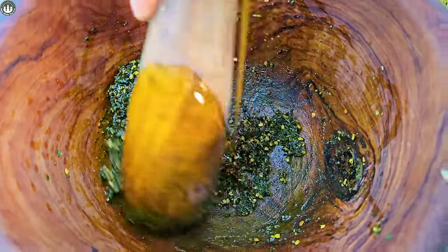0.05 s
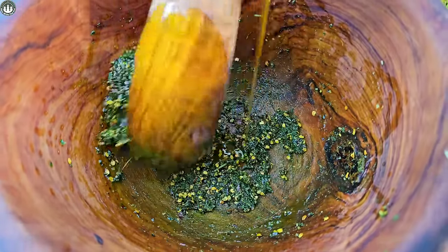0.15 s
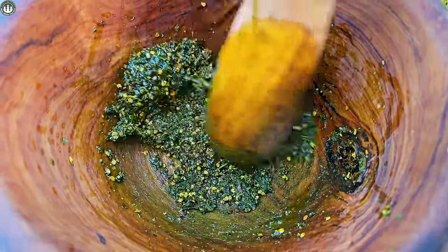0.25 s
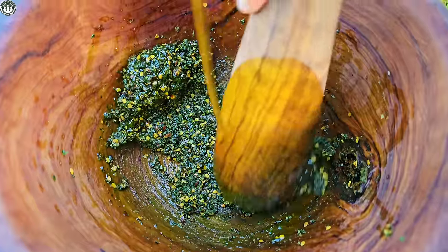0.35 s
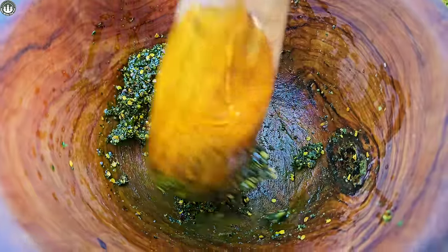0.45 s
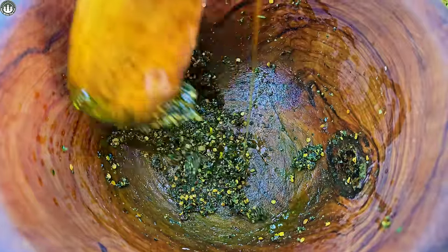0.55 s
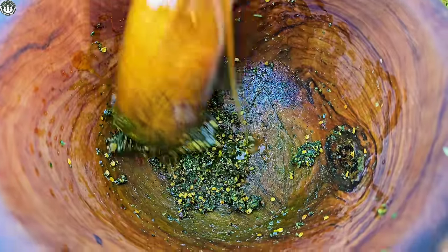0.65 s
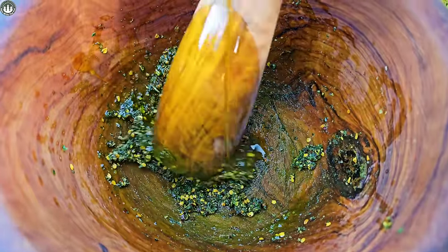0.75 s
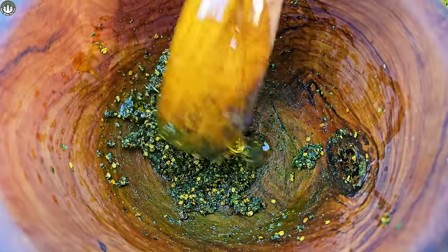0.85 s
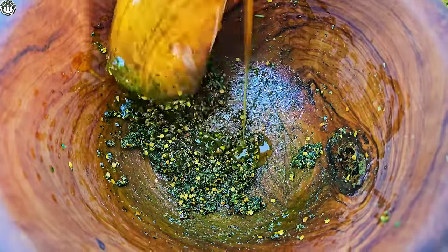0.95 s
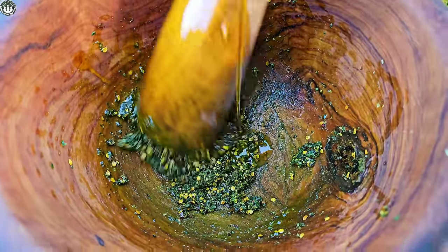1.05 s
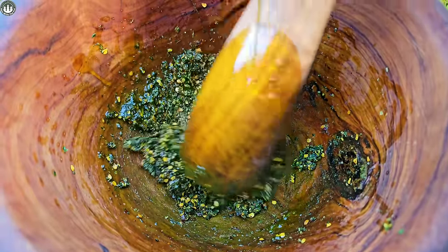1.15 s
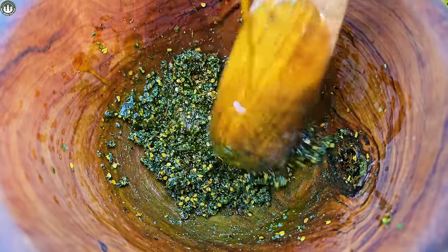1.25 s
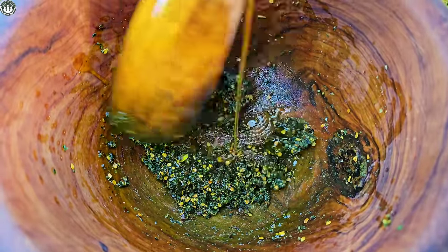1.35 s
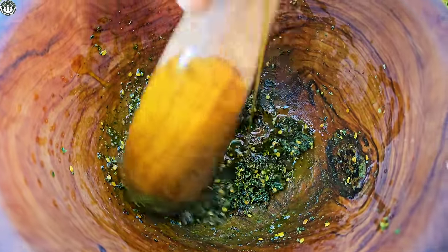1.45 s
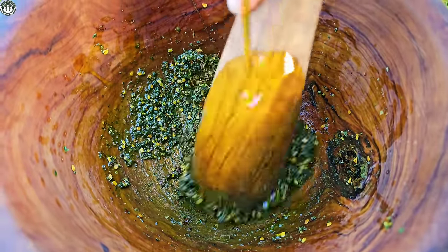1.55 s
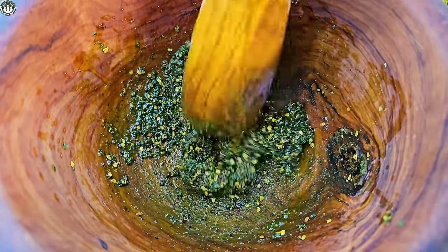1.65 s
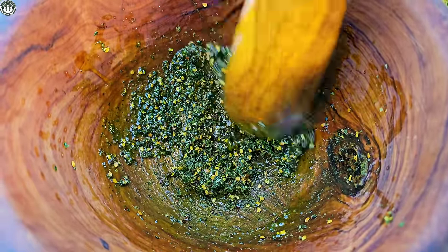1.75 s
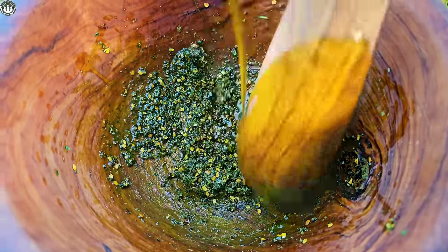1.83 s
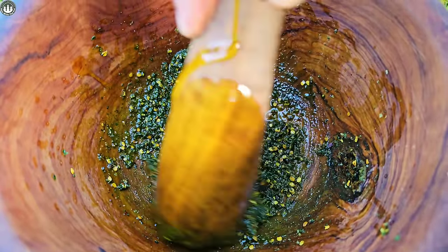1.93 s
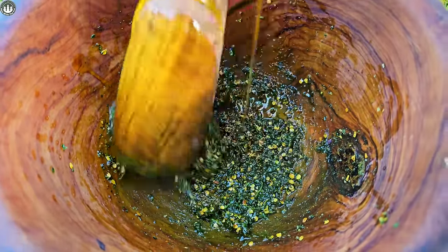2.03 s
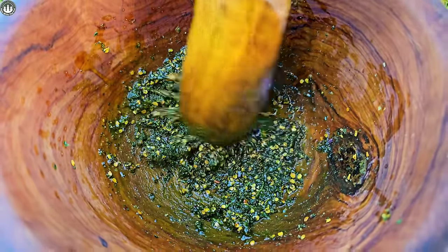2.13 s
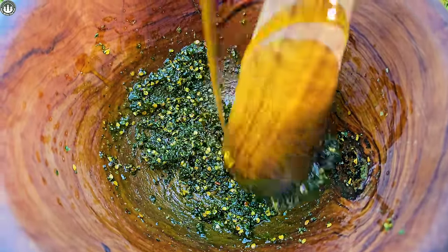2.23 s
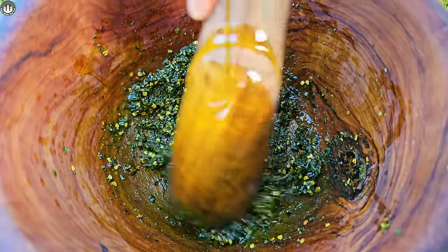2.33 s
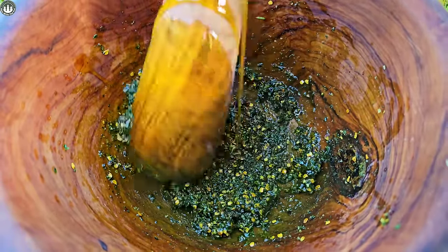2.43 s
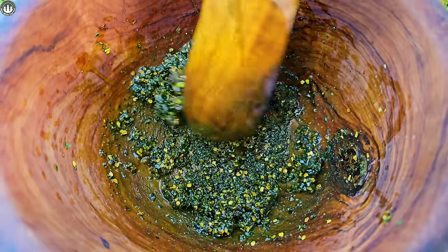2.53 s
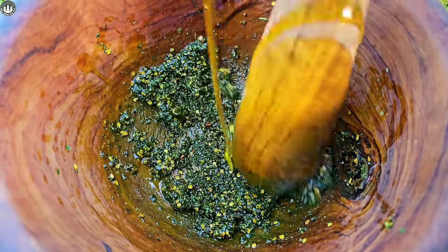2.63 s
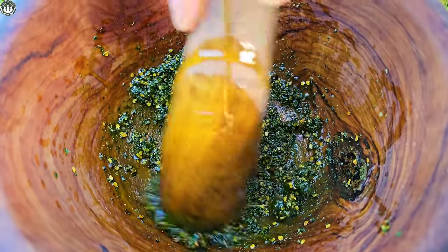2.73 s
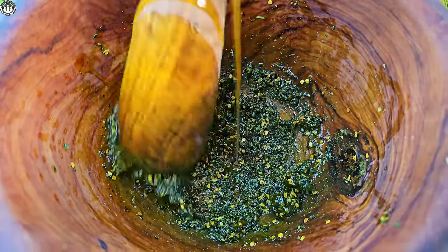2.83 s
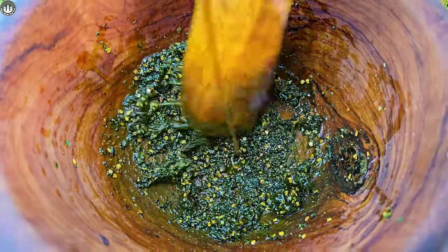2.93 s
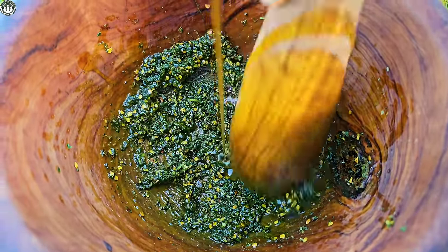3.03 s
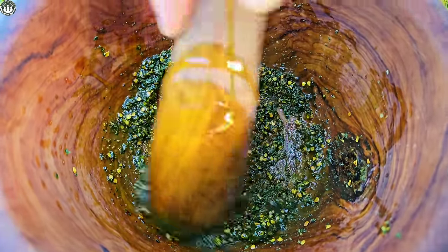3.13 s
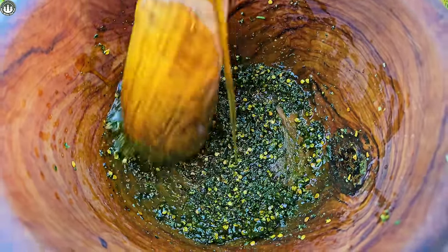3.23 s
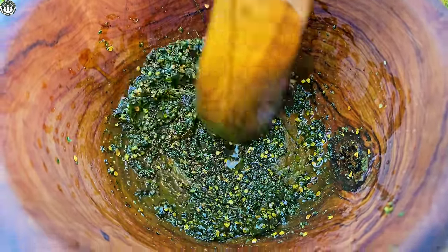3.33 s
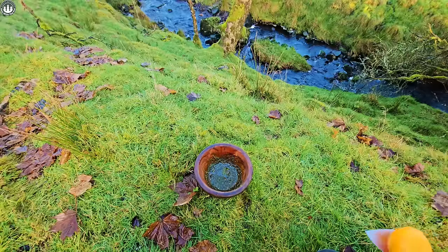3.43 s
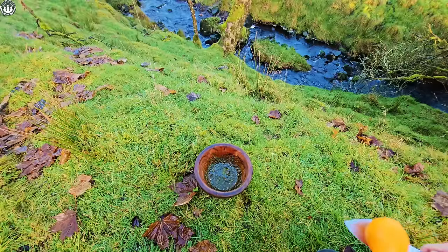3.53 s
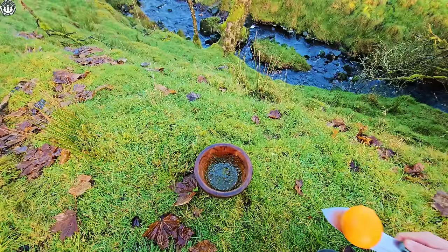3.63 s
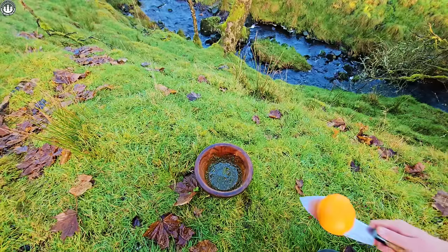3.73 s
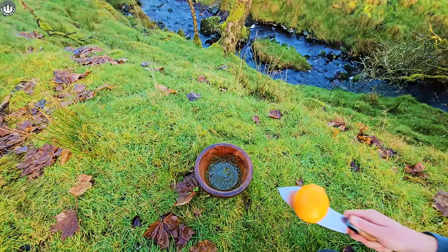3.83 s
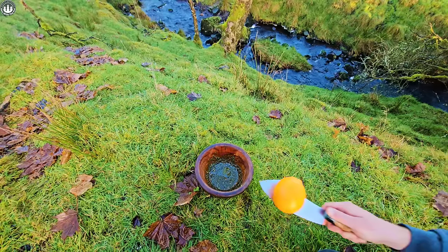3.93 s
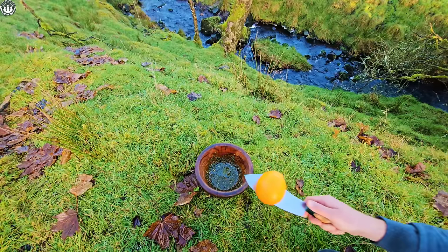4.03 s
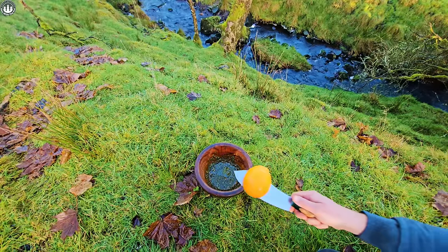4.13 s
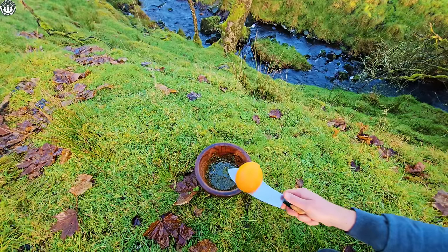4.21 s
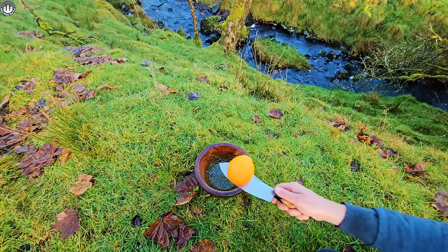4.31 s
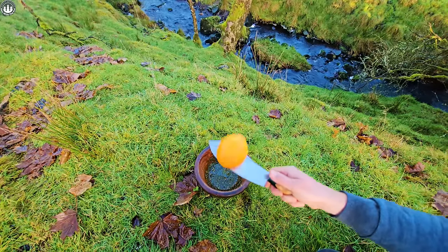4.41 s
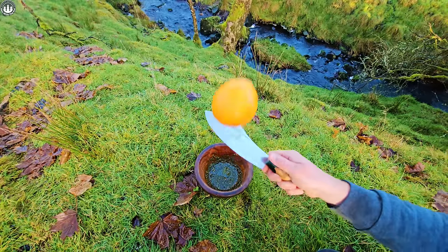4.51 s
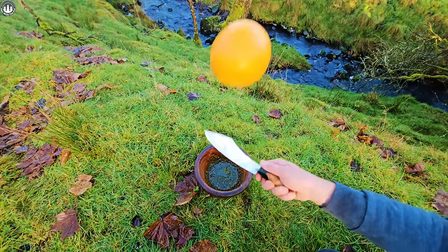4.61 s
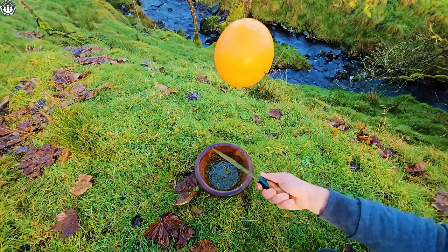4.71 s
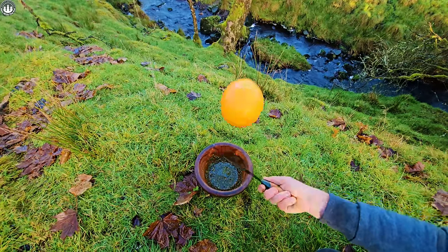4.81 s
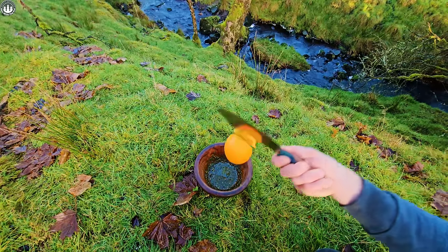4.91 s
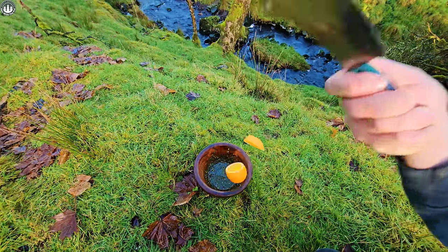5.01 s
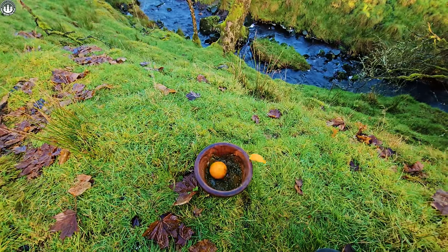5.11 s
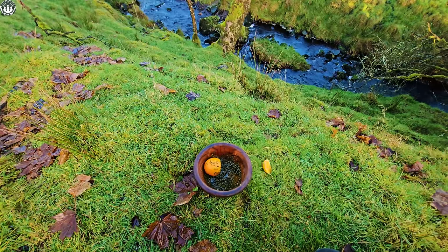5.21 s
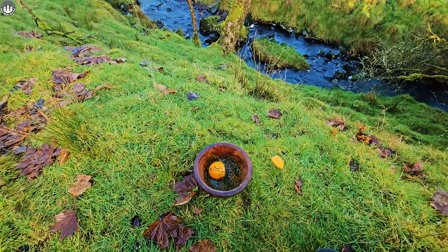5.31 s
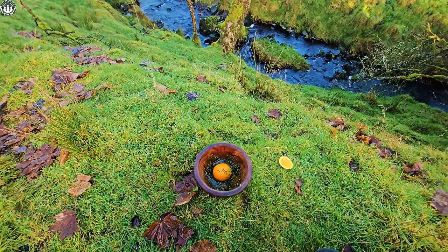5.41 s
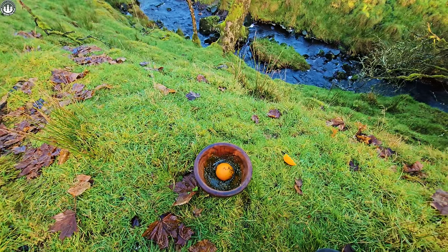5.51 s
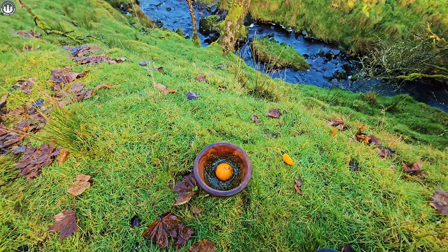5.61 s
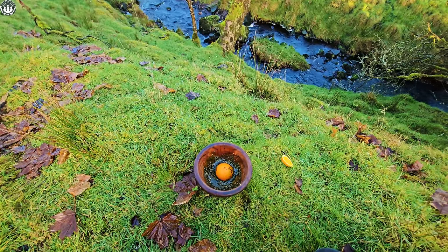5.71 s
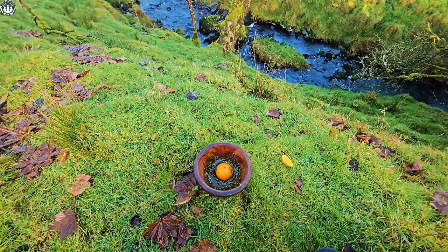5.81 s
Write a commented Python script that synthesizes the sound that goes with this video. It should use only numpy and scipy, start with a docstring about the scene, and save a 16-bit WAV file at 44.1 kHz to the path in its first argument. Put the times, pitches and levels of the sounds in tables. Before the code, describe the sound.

Close to the microphone, outdoors, a wooden pestle drags through oily herbs and seeds in a wooden mortar. Leaves crunch, seeds snap and oil fizzes, with a few hollow, thudding blows before the grinding turns continuous. It stops suddenly and a small stream babbles softly. Further off, a knife chops a citrus fruit with a wet slap, and the fruit drops into the mortar. A low breeze runs throughout.

```python
"""Close by, outdoors, a wooden pestle drags through oily herbs and seeds in a wooden mortar and pounds
them: leaves crunch and pop, seeds snap, oil fizzes, and the blows ring the bowl and thud on the ground.
From 1.5 s the pestle circles without lifting. At 3.6 s it stops and the scene moves beside a small stream.
At 5 s, further off, a knife chops through a tossed citrus fruit with a wet slap; the fruit drops into
the mortar and the cut-off end skips into the grass. A low breeze runs throughout."""
import sys
import numpy as np
from scipy import signal
from scipy.fft import rfft, irfft, next_fast_len
from scipy.io import wavfile
from scipy.ndimage import uniform_filter1d, map_coordinates

SR = 44100
rng = np.random.default_rng(int(sys.argv[2]) if len(sys.argv) > 2 else 0)


def store_wav(level_fs):
    """Save 16-bit WAV to argv[1]."""
    pcm = np.round(np.clip(np.atleast_2d(level_fs), -1, 1) * 32767)
    wavfile.write(sys.argv[1], SR, pcm.T.astype(np.int16))


N = 258418
TIME_S = np.arange(N) / SR


# freq_hz, level_db
CRUNCH_SPECTRUM = [(300, -65), (750, -32), (1000, -6), (1500, -7), (2000, 2), (2600, -1.5), (3300, 2.5),
                   (4500, -3), (6500, -28), (10000, -37.5), (16000, -40.5)]
FIZZ_SPECTRUM = [(2000, -10), (4500, 9), (8000, 4), (9600, -0.5), (10600, -7.5), (12500, 1), (15500, -1)]
RUMBLE_SPECTRUM = [(15, -27), (35, -5), (80, 3.5), (160, 1), (240, 0), (340, -8), (500, -7), (1000, -56)]

def grinding():
    """Leaves and seeds crush in tiny fractures; the dragging pestle sounds and shakes the mortar."""
    on_paste, on_wood = pestle_force()
    slip_db = 2.04 * wobble(70)  # catch and slide
    oil_db = -1.0 * TIME_S  # oil softens fizz and rub
    grit = grains(rate_hz=2000, spread_db=-1.5, life_s=0.0021)
    crunch = amp(-40.5 + slip_db) * on_paste * grit * wet_cavities(noise(shape(CRUNCH_SPECTRUM)))
    oil_films = grains(rate_hz=350, spread_db=7, life_s=0.00015)
    fine_grit = grit * wet_cavities(noise(shape(FIZZ_SPECTRUM)))
    film_pops = amp(-7.5) * oil_films * noise(shape(FIZZ_SPECTRUM))
    wetness = ((on_paste + 1e-9) / (on_wood + 1e-9)) ** 0.36
    fizz = amp(-42.5 + slip_db + oil_db) * on_paste ** 0.67 * wetness * (fine_grit + film_pops)
    friction = wandering_hollow(grit * noise(np.ones_like))
    rub = amp(-39.5 + slip_db + oil_db) * on_wood ** 1.07 * friction
    rumble = amp(-43.5 + 0.94 * wobble(50)) * on_wood ** 0.98 * noise(shape(RUMBLE_SPECTRUM))
    return pan(crunch + fizz, left_db=7.5) + pan(rub, left_db=3.5) + pan(rumble, left_db=5)


# peak_s, rise_s, fall_s, force_db, wood_contact_db
PESTLE_DRAGS = [(0.019, 0.12, 0.041, 1, 5.5), (0.102, 0.041, 0.027, 5, -1),
                (0.174, 0.045, 0.071, 3.5, -5.5), (0.347, 0.086, 0.061, 3.5, 0.5),
                (0.446, 0.018, 0.024, -2, -5), (0.794, 0.052, 0.027, 2.5, -1.5),
                (.885, 0.029, 0.031, -4.5, -5.5), (1.165, 0.047, 0.055, 2, -0.5),
                (1.279, 0.048, 0.029, -1, 7.5)]
# time_s, force_db, wood_contact_db
PESTLE_CIRCLING = [(1.505, -1, -5.5), (1.73, -4.5, -1), (1.79, -9, 1), (1.88, -2, -0.5),
                   (1.989, -2.5, -2.5), (2.07, 0, -6), (2.13, -2.5, -1.5), (2.27, 2, 1.5), (2.39, -8, -1.5),
                   (2.58, -4, -6), (2.7, 1, 2.5), (2.78, -8, 1), (2.87, 0.5, 3.5), (2.97, -3, 2.5),
                   (3.04, 2.5, 4), (3.19, -3, 0.5), (3.3, 0, 1), (3.555, 2, 3)]

def pestle_force():
    """Force on the paste and on bare wood, as gains: single drags, then unbroken circling."""
    pushes = [amp(db) * swell(s, s, rise_s, fall_s) for s, rise_s, fall_s, db, _ in PESTLE_DRAGS]
    contacts = [amp(db) for *_, db in PESTLE_DRAGS]
    knots_s, force_db, contact_db = np.transpose(PESTLE_CIRCLING)
    circling = swell(knots_s[0], knots_s[-1], rise_s=0.02, fall_s=0.027)
    pushes.append(amp(np.interp(TIME_S, knots_s, force_db)) * circling)
    contacts.append(amp(np.interp(TIME_S, knots_s, contact_db)))
    wood_pushes = [push * contact for push, contact in zip(pushes, contacts)]
    return np.max(pushes, axis=0), np.max(wood_pushes, axis=0)


def wet_cavities(x, depth_db=3):
    """Shifting wet cavities lift and drop narrow bands from moment to moment."""
    spectra = signal.stft(x, nperseg=512)[2]
    field = uniform_filter1d(rng.standard_normal(spectra.shape[1:]), size=4, axis=0)
    field = unit(uniform_filter1d(field, size=5, axis=1))
    return unit(signal.istft(spectra * amp(depth_db * field), nperseg=512)[1][:, :N])


# pitch_hz, width_hz, level_db
HOLLOW_RESONANCES = [(536, 54, 1.5), (1172, 87, -14.5), (2200, 54, -7), (3110, 93, -15)]

def hollow(f):
    """Response of the mortar's hollow with the pestle in it."""
    return sum(amp(db) * resonance(f, hz, width_hz) for hz, width_hz, db in HOLLOW_RESONANCES)


def wandering_hollow(x, shift=0.042):
    """The hollow sounds lower or higher as the pestle moves about in it."""
    low, high = [unit(filtered(x, lambda f: hollow(f / ratio))) for ratio in (1 - shift, 1 + shift)]
    blend = np.clip(0.5 + 0.5 * wobble(9), 0, 1)
    return unit((1 - blend) * low + blend * high)


# start_s, crack_db, crack_hz, wall_db, ring_db, ring_hz, thud_db, rock_db
PESTLE_BLOWS = [(0.6759, -6, 4200, -10.5, -11, 480, 2.5, -30), (1.0414, -8, 850, -7.5, -0.5, 487, 4, -30),
                (1.4733, -17, 3350, -19.5, -15.5, 477, 3, -15.5),
                (2.1007, -19, 6300, -20, -25.5, 507, 1.5, -15.5)]
# freq_hz, level_db
CRACK_SPECTRUM = [(200, 4), (700, 8), (1400, 12), (2500, 3.5), (4500, 0), (8000, -3), (16000, 5)]
# freq_hz, left_db
CRACK_PAN = [(700, -6), (4500, 7), (7500, 5)]
# pitch_hz, level_db, t60_s
WALL_MODES = [(1730, -8, .017), (2030, 3.5, 0.02), (2405, -3, 0.021), (3095, 8.5, 0.012), (4770, 0, 0.01)]
# pitch_ratio, level_db, t60_s
CAVITY_MODES = [(.84, -21, 0.05), (1.001, -1.5, 0.094), (1.17, -23, 0.06), (2.61, -21, 0.039)]

def blows():
    """The pestle smacks through the paste; wall and hollow ring; the mortar thuds and rocks."""
    out, t = np.zeros((2, N)), np.arange(SR // 5) / SR
    mode = lambda hz, t60_s: damped_sine(t, hz, t60_s, attack_s=0.0028)
    low_cut = lambda f: 1j * f / (57.3 + 1j * f)  # keeps deep rumble out of the thud
    thud = filtered(mode(hz=187, t60_s=0.01), low_cut)
    rock = filtered(mode(hz=90, t60_s=0.042), low_cut)
    choke = np.exp(-(t / 0.07) ** 2)  # paste closes round the pestle
    paste_yield_s = 0.00195
    for s, crack_db, crack_hz, wall_db, ring_db, ring_hz, thud_db, rock_db in PESTLE_BLOWS:
        contact = lambda f: resonance(f, crack_hz, 1.05 * crack_hz)  # more paste, duller crack
        crack_colour = lambda f: contact(f) * shape(CRACK_SPECTRUM)(f)
        crack = burst(fade(t, t60_s=0.011, attack_s=0.00068), crack_colour)
        wall = sum(amp(db) * abs(contact(hz)) * mode(hz, t60_s) for hz, db, t60_s in WALL_MODES)
        ring = sum(amp(db) * mode(ratio * ring_hz, t60_s) for ratio, db, t60_s in CAVITY_MODES)
        add(out, s, amp(crack_db + 1.5) * pan_bands(crack, CRACK_PAN))
        add(out, s, amp(wall_db) * pan(wall, left_db=2))
        add(out, s, -pan(amp(thud_db) * thud + amp(rock_db) * rock, left_db=-2.5))
        add(out, s + paste_yield_s, amp(ring_db) * pan(choke * ring, left_db=1.8))
    return out


# start_s, snap_db, t60_s, pitch_hz, width_oct, jolt_db
SEED_BURSTS = [(.004, -24, 0.039, 7100, 1.9, -28), (.304, -14.5, 0.032, 2970, 0.57, -30),
               (0.3162, -9, 0.009, 3800, 0.67, -23), (.339, -17.5, 0.018, 6000, .9, -24),
               (.362, -23, 0.043, 4470, 0.79, -20.5), (1.281, -19.5, .012, 3500, 1.2, -22.5),
               (1.4755, -11, 0.016, 3020, 0.37, -36), (2.038, -23, 0.066, 3300, 0.7, -28.5),
               (2.218, -17, 0.022, 2100, 0.5, -34), (2.532, -24, 0.022, 4000, 0.7, -27.5),
               (2.615, -21.5, 0.046, 4400, 0.72, -26.5), (2.809, -12.5, 0.019, 3770, 0.23, -50),
               (3.043, -14, 0.032, 3300, 0.47, -34), (3.052, -6.5, 0.011, 3260, 0.48, -25),
               (3.079, -13.5, .026, 2620, 0.53, -24.5), (3.132, -24, 0.034, 3500, 0.84, -22),
               (3.2439, -12, 0.015, 3120, 0.15, -25.5), (3.2495, -11, 0.02, 2900, 0.41, -18),
               (3.275, -22, 0.037, 3530, 0.1, -25.5), (3.318, -12, 0.02, 4970, 0.36, -26),
               (3.34, -17, .012, 5200, .35, -24.5), (3.389, -17.5, 0.035, 2280, 0.71, -24),
               (3.449, -27.5, 0.11, 4500, 0.57, -26), (3.531, -15, 0.016, 4200, 0.59, -28),
               (3.558, -25, 0.02, 3000, 0.57, -25.5), (3.608, -24.5, 0.019, 3130, 0.16, -26.5)]

def seeds():
    """A large seed gives way in a brief run of snaps, and the pestle jolts against the bowl."""
    out, t = np.zeros((2, N)), np.arange(SR // 8) / SR
    for s, snap_db, t60_s, hz, width_oct, jolt_db in SEED_BURSTS:
        splinters = grains(rate_hz=3400, spread_db=4.5, life_s=0.0004, n=len(t))
        snap = burst(fade(t, t60_s, attack_s=0.00095) * splinters, band(hz, width_oct))
        add(out, s, amp(snap_db - 5.5) * snap + amp(jolt_db) * jolt(t60_s=0.031, shake_db=-7))
    return pan(out, left_db=5.5)


# start_s, level_db, t60_s, shake_db
PESTLE_BUMPS = [(.052, -23.5, 0.051, -12), (.305, -22.5, .05, -16), (.34, -17.5, .034, -16),
                (.363, -21, 0.041, -5), (.809, -23.5, .038, -26), (1.155, -23.5, 0.024, -7),
                (1.193, -26, 0.027, -3), (1.2556, -19.5, 0.026, -8), (1.293, -19.5, 0.03, 2),
                (1.557, -21, 0.04, 1), (1.62, -25.5, 0.021, 7), (1.699, -23, 0.036, -2),
                (1.735, -24, 0.035, -9), (2.04, -21.5, 0.056, -8), (2.064, -26, 0.065, -8),
                (2.078, -22, .025, -8), (3.08, -24, 0.027, 1), (3.313, -24.5, .05, -2),
                (3.395, -26, .06, 5), (3.455, -23, 0.066, 1), (3.53, -21.5, .03, 0), (3.546, -20, .02, 5),
                (3.558, -19, 0.02, -3)]

def bumps():
    """The pestle slips off the paste and knocks dully on the bare bowl."""
    out = np.zeros((2, N))
    for s, db, t60_s, shake_db in PESTLE_BUMPS:
        add(out, s, amp(db) * jolt(t60_s, shake_db))
    return pan(out, left_db=5)


def jolt(t60_s, shake_db):
    """One knock of wood on wood: the hollow sounds and the mortar shakes."""
    t = np.arange(SR // 8) / SR
    colour = lambda f: hollow(f) + amp(shake_db) * shape(RUMBLE_SPECTRUM)(f)
    return burst(fade(t, t60_s, attack_s=0.00097), colour)


def leaf_pops(rate_hz=190, centre_hz=6200, scatter_oct=0.7, t60_cycles=9):
    """Oily leaves pop in clumps, thicker and louder under force; each pop rings at its own pitch."""
    out, t = np.zeros((2, N)), np.arange(SR // 40) / SR
    on_paste, _ = pestle_force()
    chance = rate_hz / SR * on_paste * amp(4 * wobble(25))
    draws = rng.standard_normal((N, 4))
    for i in np.flatnonzero(rng.random(N) < chance):
        size, pitch, side, right_phase = np.clip(draws[i], -2, 2)
        hz = centre_hz * 2 ** (scatter_oct * pitch)
        ring = damped_sine(t, hz, t60_cycles / hz, attack_s=0.0001, phase=np.array([[0], [right_phase]]))
        gain = amp(-28 + 5 * size) * np.sqrt(on_paste[i])
        add(out, i / SR, gain * pan(ring, left_db=8.5 + 2 * side))
    return out


# start_s, level_db
FILM_SNAPS = [(.1685, -26), (0.342, -13), (.603, -35), (.7472, -29), (1.0417, -22), (1.281, -25),
              (1.4516, -28), (1.533, -27), (2.345, -25), (3.1577, -23), (3.2226, -20.5)]

def oil_ticks():
    """A stretched film of oil breaks in one bright tick."""
    out, t = np.zeros((2, N)), np.arange(SR // 30) / SR
    envelope = fade(t, t60_s=0.0042, attack_s=0.00027)
    for s, db in FILM_SNAPS:
        add(out, s, amp(db) * burst(envelope, band(hz=9300, width_oct=0.9)))
    return pan(out, left_db=7.5)


# start_s, level_db, length_s, pitch_hz, width_oct
PASTE_POCKETS = [(0.089, -35, 0.036, 2100, 0.22), (0.15, -35.5, 0.054, 3540, .4),
                 (.354, -30, 0.019, 2310, 0.13), (1.254, -38, 0.039, 950, 0.18),
                 (1.838, -38.5, 0.038, 2330, 0.18), (1.858, -39, 0.051, 2200, 0.062),
                 (2.142, -36.5, 0.034, 2080, 0.28), (2.676, -39.5, .08, 2220, 0.061),
                 (3.015, -30.5, 0.031, 3400, 0.32), (3.073, -31.5, 0.037, 2160, 0.058),
                 (3.389, -36.5, 0.028, 3080, 0.052), (3.441, -33, 0.035, 2200, 0.038)]

def squelches():
    """A pocket of oil and air is squeezed from the paste, sputtering through its own resonance."""
    out, t = np.zeros((2, N)), np.arange(SR // 8) / SR
    for s, db, length_s, hz, width_oct in PASTE_POCKETS:
        envelope = np.sin(np.pi * np.minimum(t / length_s, 1))
        sputter = grains(rate_hz=700, spread_db=3, life_s=0.0015, n=len(t))
        add(out, s, amp(db) * burst(envelope * sputter, band(hz, width_oct)))
    return pan(out, left_db=6)


# peak_s, half_length_s, level_db, pitch_hz
FROTH_SWELLS = [(.105, .016, -44, 10000), (0.183, 0.043, -40, 7200), (.37, .02, -42, 9000),
                (.775, 0.021, -47, 11000), (1.539, .015, -44, 8500), (1.606, 0.038, -47, 8000),
                (2.05, 0.038, -40, 9500), (2.106, 0.015, -39, 7500), (2.856, 0.032, -46, 14000),
                (3.48, 0.055, -45.5, 9000)]

def oil_froth():
    """Oil froths under the sliding pestle in short swells of tiny clicks."""
    out, t = np.zeros((2, N)), np.arange(SR // 4) / SR
    middle_s = t.mean()
    for peak_s, half_s, db, hz in FROTH_SWELLS:
        envelope = np.exp(-((t - middle_s) / half_s) ** 2)
        clicks = grains(rate_hz=1300, spread_db=4.5, life_s=0.00015, n=len(t))
        add(out, peak_s - middle_s, amp(db) * burst(envelope * clicks, band(hz, width_oct=0.5)))
    return pan(out, left_db=4.5)


# start_s, slap_db, t60_s, pitch_hz, spray_re_slap_db, peel_db
FRUIT_CONTACTS = [(5.0038, -16, 0.018, 1530, -14, 0), (5.0098, -24.5, 0.019, 640, -7, -20),
                  (5.0143, -20, 0.011, 1780, 2, -24), (5.1624, -38, 0.011, 2000, 6, -40),
                  (5.1664, -17.5, 0.0092, 1100, 0, -17), (5.168, -24.5, 0.014, 655, 1.5, -13),
                  (5.1706, -24, 0.032, 2300, -12, -22), (5.1843, -35, 0.0084, 2000, 7.5, -32),
                  (5.229, -39, 0.013, 6500, 1, -40), (5.2402, -25.5, 0.011, 4100, -13, -22),
                  (5.2477, -33.5, 0.024, 4000, -9, -32), (5.2750, -29, 0.01, 4500, -12, -27)]
# freq_hz, level_db
SLAP_SPECTRUM = [(100, -15), (260, -3), (340, -26), (450, 5.5), (900, -1.5), (1400, -0.5), (2200, 6),
                 (2600, -17), (3600, 0.5), (6000, -15)]
JUICE_SPECTRUM = [(100, -22), (250, 7), (350, -16), (600, 9), (2200, 2), (2700, 8), (3700, 5), (9000, 3),
                  (11000, -5), (15500, -2)]
# pitch_hz, level_db, t60_s
OPEN_MORTAR_MODES = [(620, -3, 0.028), (1430, -12, 0.04), (1705, 0, 0.032), (2160, 3, 0.034),
                     (2955, -3.5, 0.032)]
# freq_hz, left_db
FRUIT_PAN = [(500, 0.5), (1400, 14), (3000, 2.5), (8000, 1.5), (13000, 8)]

def fruit(landing_s=5.169, peel_cycles=4.8):
    """Cut, landing and skips each snap the peel, slap and spray juice; the landing rings the mortar."""
    out, t = np.zeros((2, N)), np.arange(SR // 8) / SR
    mode = lambda hz, t60_s: damped_sine(t, hz, t60_s, attack_s=0.00033)
    for s, slap_db, t60_s, hz, spray_db, peel_db in FRUIT_CONTACTS:
        slap_colour = lambda f: resonance(f, hz, 0.7 * hz) * shape(SLAP_SPECTRUM)(f)
        slap = burst(fade(t, t60_s, attack_s=0.0001), slap_colour)
        drops = grains(rate_hz=2800, spread_db=5.5, life_s=0.00061, n=len(t))
        spray = burst(fade(t, 2.4 * t60_s, attack_s=0.00032) * drops, shape(JUICE_SPECTRUM))
        peel = mode(hz, peel_cycles / hz)
        add(out, s, amp(slap_db + 1.5) * (slap + amp(spray_db) * spray) - amp(peel_db) * peel)
    ring = sum(amp(db) * mode(hz, t60_s) for hz, db, t60_s in OPEN_MORTAR_MODES)
    add(out, landing_s, amp(-23) * ring)
    return pan_bands(out, FRUIT_PAN)


# freq_hz, level_db
STREAM_SPECTRUM = [(250, -36), (360, -12), (600, -0.5), (850, -1), (1050, -5.5), (1330, -0.5), (2200, -6.5),
                   (2650, -13), (3500, -9), (6000, -14), (9000, -18), (10700, -22.5), (14000, -20)]

def stream():
    """A small stream babbles in dense, tiny splashes."""
    gain = amp(-43.5 + 0.45 * wobble(2.335))
    splashes = grains(rate_hz=3600, spread_db=-1, life_s=0.0028)
    return gain * splashes * noise(shape(STREAM_SPECTRUM))


# peak_s, half_length_s, level_db, pitch_hz
HUM_SWELLS = [(3.682, 0.15, -43.5, 252), (5.28, 0.016, -42, 197)]

def hum():
    """A low hum swells briefly."""
    return sum(amp(db) * swell(s, s, half_s, half_s) * noise(band(hz, width_oct=0.2))
               for s, half_s, db, hz in HUM_SWELLS)


# freq_hz, level_db
BREEZE_SPECTRUM = [(15, -37), (30, -6.5), (70, -1.5), (120, 2), (190, 0.5), (260, 0), (340, -13.5),
                   (600, -12.5), (1500, -39)]
HISS_SPECTRUM = [(200, -7), (400, 2.5), (800, -1.5), (2000, -2.5), (5000, -6), (9000, -12.5),
                 (11000, -13.5), (15500, -10.5)]

def outdoors(stream_start_s=3.58, crossfade_s=0.0074):
    """Low moving air throughout; a faint hiss gives way to the stream."""
    low_air = hum() + amp(-46 + 1.2 * wobble(14)) * noise(shape(BREEZE_SPECTRUM))
    hiss = amp(-46) * noise(shape(HISS_SPECTRUM))
    blend = np.clip((TIME_S - stream_start_s) / crossfade_s, 0, 1)
    return pan(low_air, left_db=0.3) + pan((1 - blend) * hiss + blend * stream(), left_db=2.5)


# freq_hz, correlation
STEREO_LIKENESS = [(60, .97), (200, .93), (600, .8), (1300, .3), (3000, .15), (7000, 0)]

def noise(colour, n=N):
    """Coloured stereo noise of rms 1, alike in the bass and unrelated in the treble."""
    def mid_side(f):
        angle = np.arccos(np.clip(along(STEREO_LIKENESS, f), -1, 1)) / 2
        return colour(f) * np.array([np.cos(angle), np.sin(angle)])
    mid, side = filtered(rng.standard_normal((2, n)), mid_side)
    return unit(np.array([mid + side, mid - side]))


def burst(envelope, colour):
    """A puff of coloured noise with the energy of its envelope."""
    x = envelope * noise(colour, len(envelope))
    return x * np.linalg.norm(envelope) / np.linalg.norm(x, axis=1, keepdims=True)


def grains(rate_hz, spread_db, life_s, n=N):
    """Envelope of rms 1: brief pulses of uneven size at random moments."""
    hits = rng.random(n) < rate_hz / SR
    sizes = hits * amp(spread_db * np.clip(rng.standard_normal(n), -2, 2))
    energy = signal.lfilter([1], [1, -np.exp(-1 / (life_s * SR))], sizes ** 2)
    return unit(np.sqrt(energy))


def wobble(rate_hz):
    """A smooth random curve."""
    knots = rng.standard_normal(int(N * rate_hz / SR) + 4)
    return map_coordinates(knots, [TIME_S * rate_hz])


def swell(start_s, end_s, rise_s, fall_s):
    """A plateau with Gaussian flanks."""
    before = np.maximum(start_s - TIME_S, 0) / rise_s
    after = np.maximum(TIME_S - end_s, 0) / fall_s
    return np.exp(-before ** 2 - after ** 2)


def fade(t, t60_s, attack_s):
    return np.exp(-np.log(1000) * t / t60_s) * (1 - np.exp(-t / attack_s))


def damped_sine(t, hz, t60_s, attack_s, phase=0):
    return fade(t, t60_s, attack_s) * np.sin(2 * np.pi * hz * t + phase)


def filtered(x, response):
    n = x.shape[-1]
    padded = next_fast_len(n + 8192)
    return irfft(rfft(x, padded) * response(np.fft.rfftfreq(padded, 1 / SR)), padded)[..., :n]


def resonance(f, hz, width_hz):
    return 1j * f * width_hz / (hz * hz - f * f + 1j * f * width_hz)


def band(hz, width_oct):
    return lambda f: np.exp(-0.5 * (np.log2((f + 1) / hz) / width_oct) ** 2)


def shape(spectrum):
    return lambda f: amp(along(spectrum, f))


def along(points, f):
    """Interpolate on a log frequency axis."""
    knots_hz, values = np.transpose(points)
    return np.interp(np.log(f + 1), np.log(knots_hz), values)


def pan(x, left_db):
    return x * amp(np.array([[1], [-1]]) * left_db / 2)


def pan_bands(x, points):
    return filtered(x, lambda f: pan(np.ones_like(f), along(points, f)))


def amp(db):
    return 10 ** (np.asarray(db) / 20)


def unit(x):
    return x / np.sqrt(np.mean(x ** 2) + 1e-20)


def add(track, start_s, sound):
    part = track[:, max(round(start_s * SR), 0):][:, :sound.shape[-1]]
    part += sound[..., :part.shape[1]]


def scene():
    """The work in the mortar, then the fruit, over the outdoor air."""
    paste = grinding() + leaf_pops() + oil_froth() + oil_ticks() + squelches()
    return paste + seeds() + bumps() + blows() + fruit() + outdoors()


# freq_hz, left_db
MIC_BALANCE = [(60, -1), (250, 0.5), (1300, 0.5), (2400, 0), (4200, -4.5), (8000, 3), (15000, -0.5)]

def record(dry, lag_s=0.00019, cutoff_hz=15830):
    """Two microphone ports: lows reach the right one later, balance varies by band, the top is cut."""
    def response(f):
        lag = np.exp(-0.5j * np.pi * np.tanh(4 * f * lag_s))
        left_gain = amp(along(MIC_BALANCE, f) / 2)
        return np.array([left_gain, lag / left_gain]) / np.sqrt(1 + (f / cutoff_hz) ** 300)
    return filtered(dry, response)


dry = scene()
out = record(dry)
store_wav(out)
```